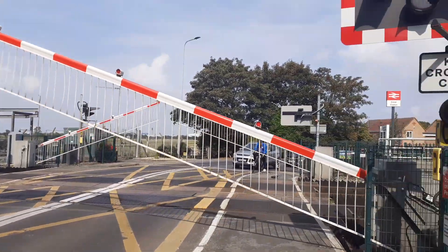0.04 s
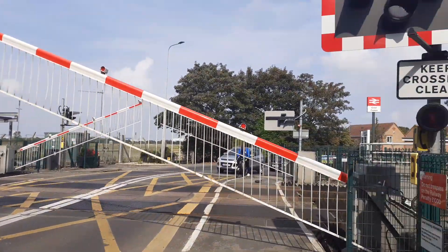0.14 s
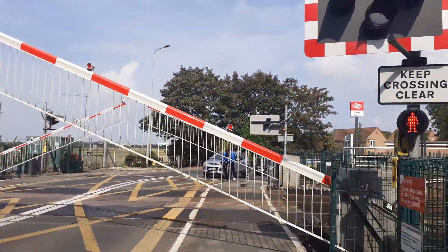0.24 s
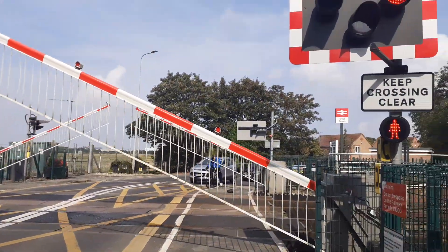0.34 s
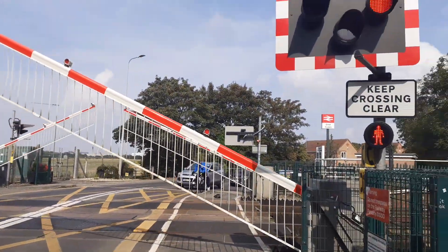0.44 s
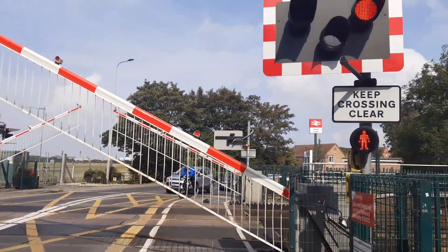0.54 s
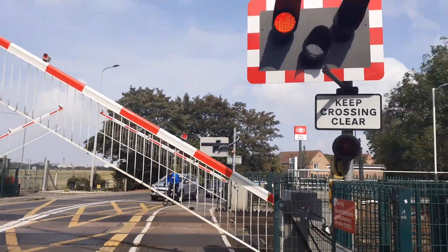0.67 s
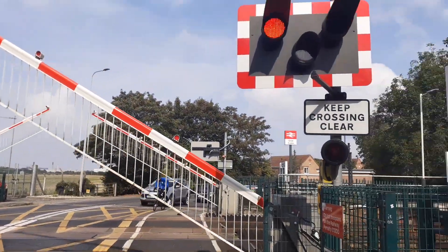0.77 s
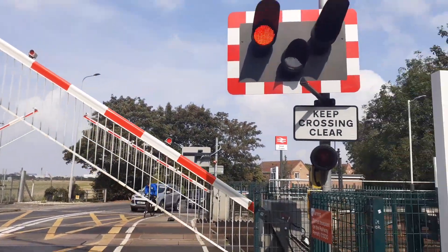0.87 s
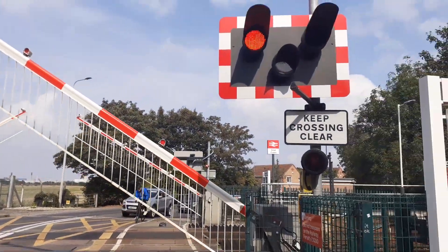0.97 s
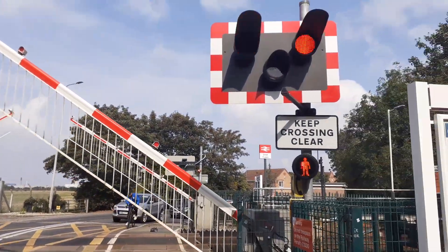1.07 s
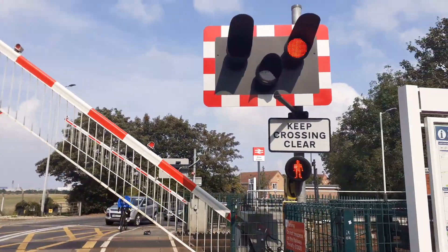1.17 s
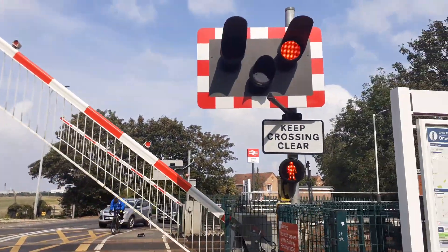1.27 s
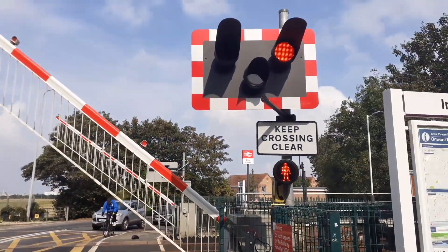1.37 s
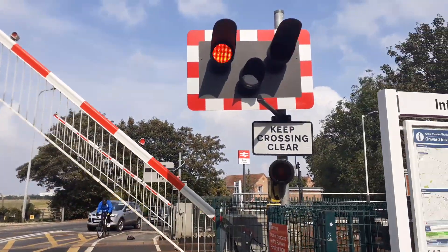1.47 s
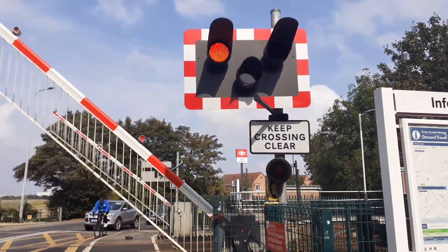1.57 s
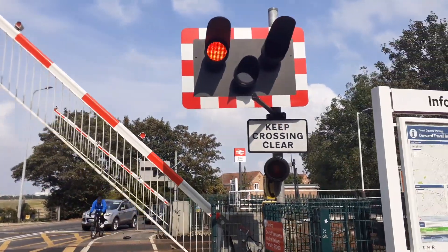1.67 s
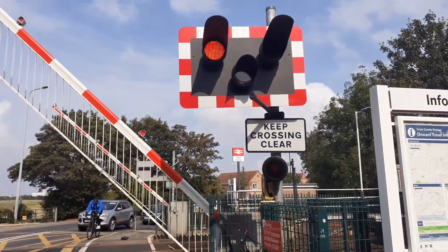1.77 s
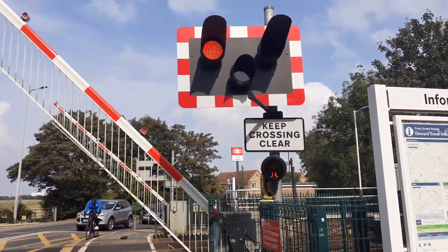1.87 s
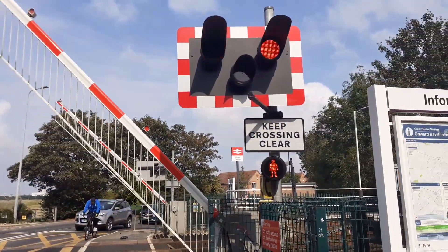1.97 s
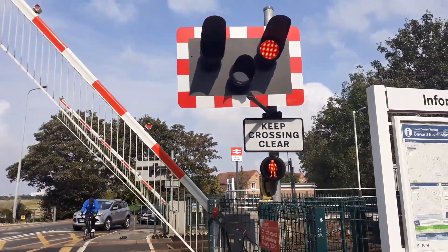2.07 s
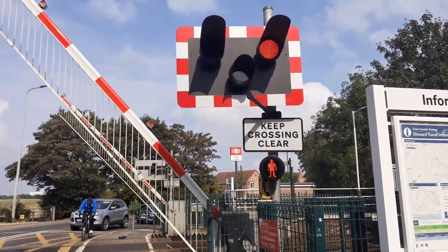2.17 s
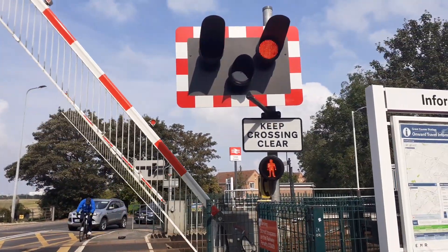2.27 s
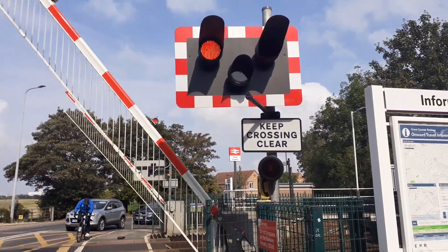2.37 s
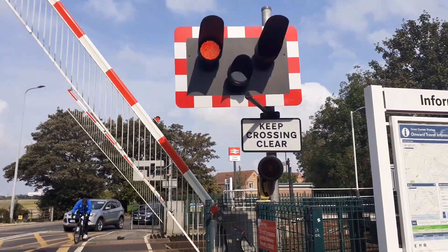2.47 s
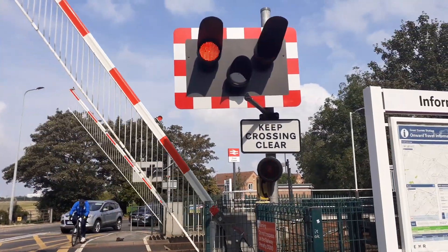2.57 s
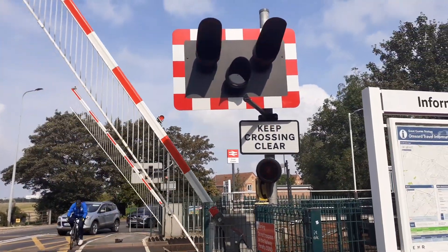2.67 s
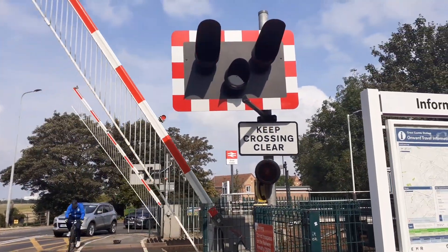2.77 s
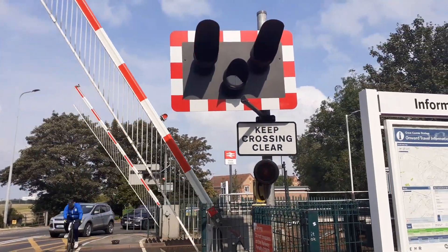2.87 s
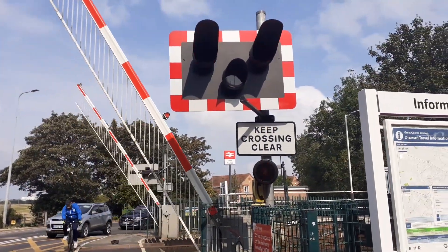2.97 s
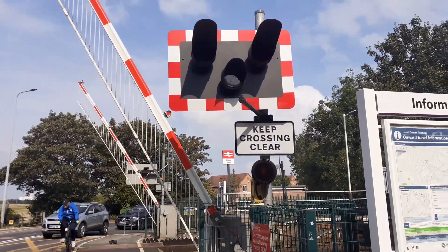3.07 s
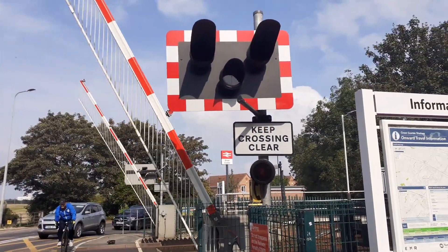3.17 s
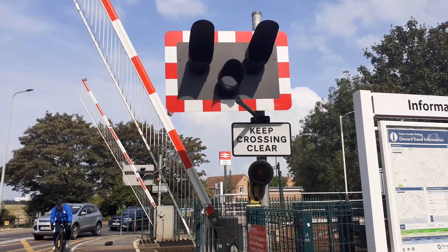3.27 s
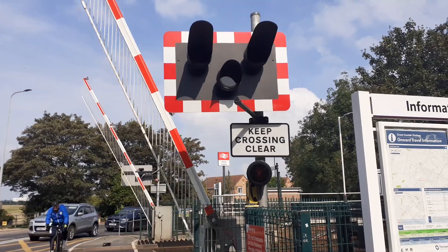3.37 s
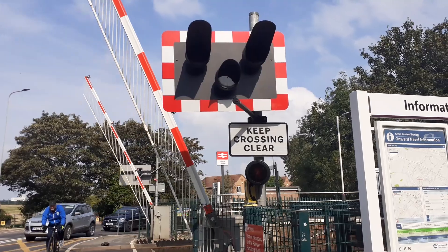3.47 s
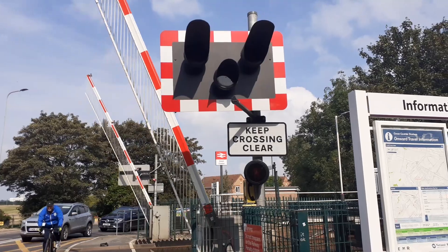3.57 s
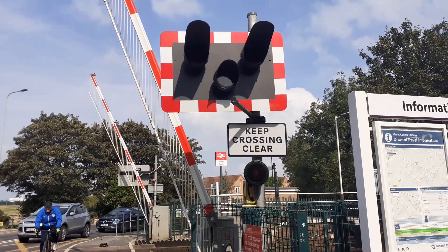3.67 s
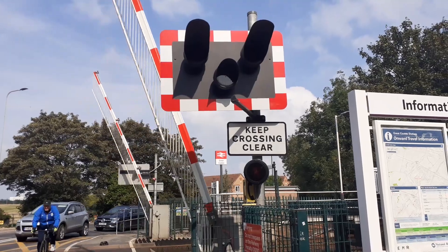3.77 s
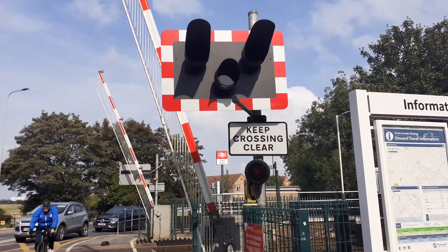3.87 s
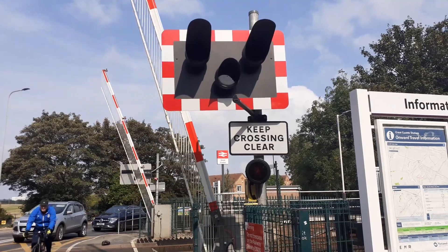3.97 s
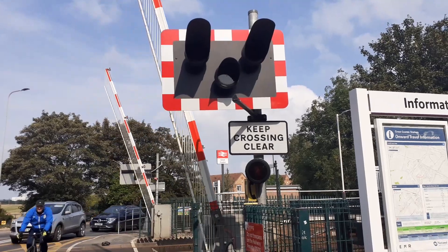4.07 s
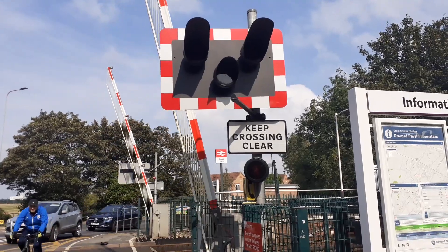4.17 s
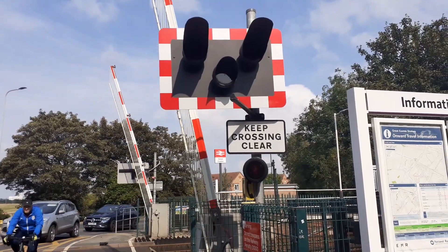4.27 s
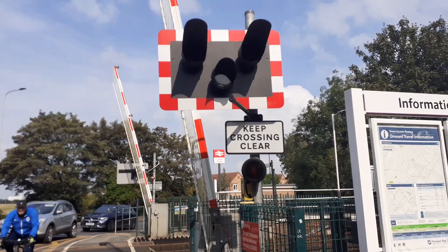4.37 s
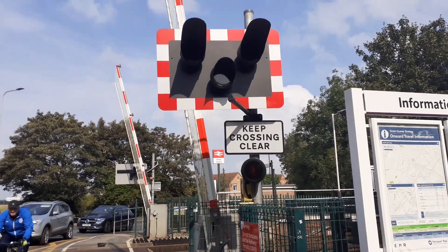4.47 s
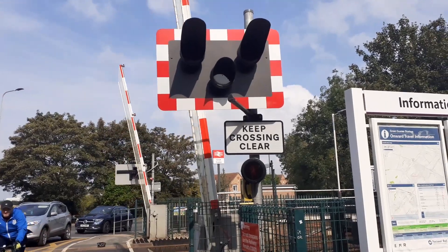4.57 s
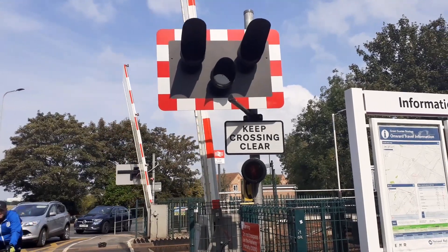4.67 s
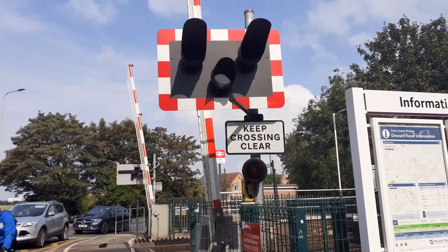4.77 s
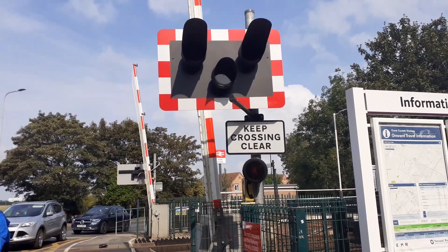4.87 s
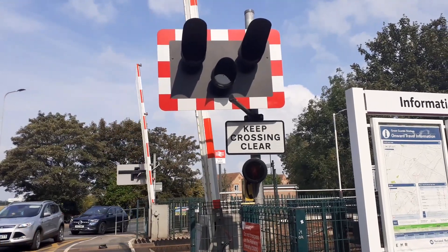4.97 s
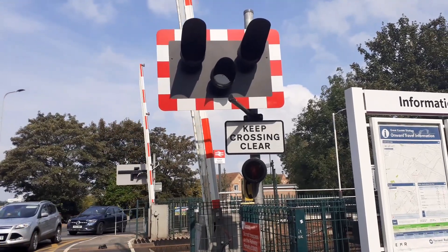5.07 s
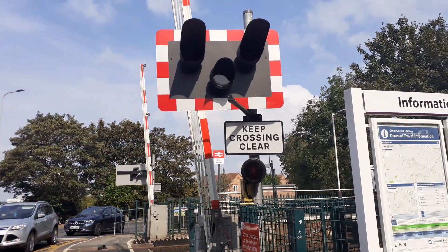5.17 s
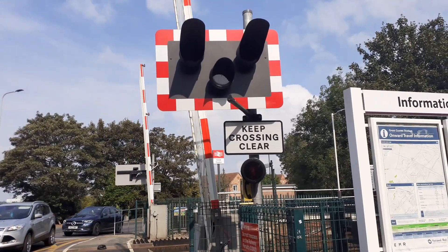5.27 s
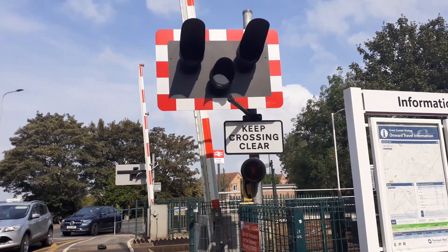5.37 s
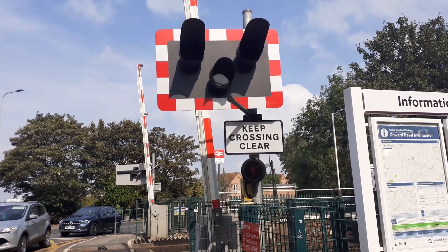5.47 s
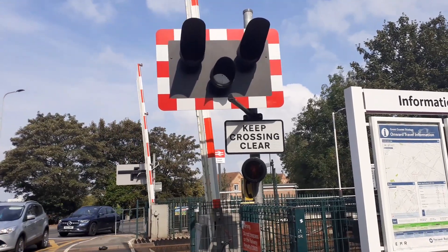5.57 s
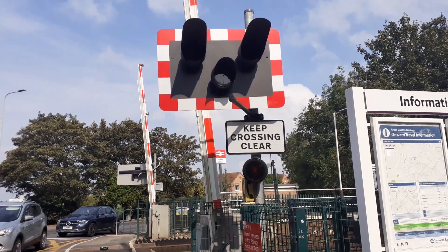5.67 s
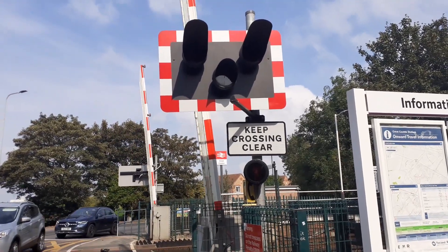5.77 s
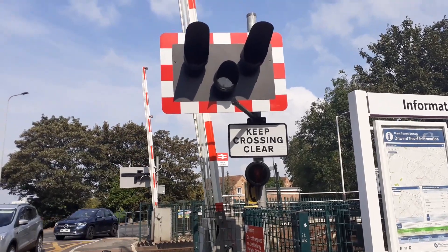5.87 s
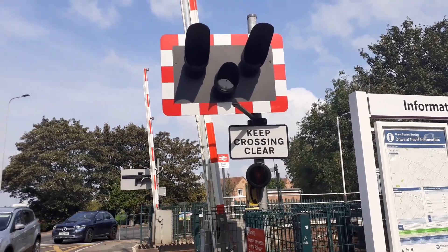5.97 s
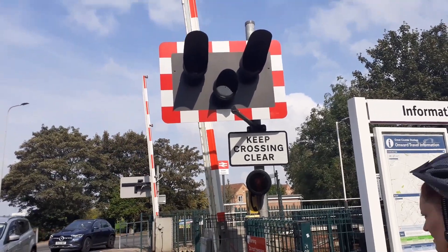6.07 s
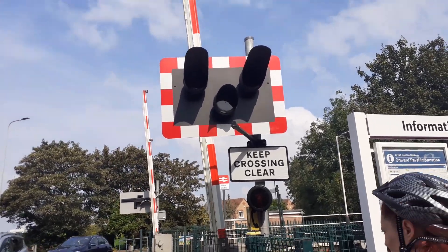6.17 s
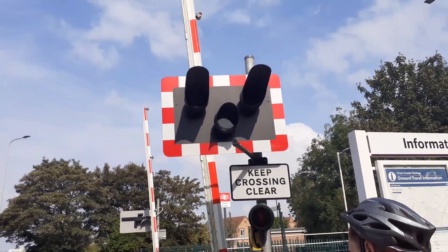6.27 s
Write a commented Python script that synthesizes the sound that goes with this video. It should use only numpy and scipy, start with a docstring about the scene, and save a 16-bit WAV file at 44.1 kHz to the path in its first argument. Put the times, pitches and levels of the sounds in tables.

```python
"""A hum with a quick, uneven throb comes first: hydraulic pumps are lifting level crossing barriers.
Oil rushes and whistles through their valves, and a thin whine comes and goes. The pumps cut out,
and the booms (the barrier arms) settle with a run of clicks and ringing latches. Waiting cars idle,
pull away and bump over the crossing, with low exhaust notes and tyre noise. A bright hiss comes
from the left, and puffs of wind catch the microphone."""
import sys
import numpy as np
from scipy import signal
from scipy.fft import rfft, irfft, next_fast_len
from scipy.io import wavfile
from scipy.ndimage import uniform_filter1d

SR = 44100
rng = np.random.default_rng(int(sys.argv[2]) if len(sys.argv) > 2 else 0)


def store_pcm(level_fs):
    """Save levels as 16-bit WAV."""
    pcm = np.round(np.clip(level_fs, -1, 1) * 32767).astype(np.int16)
    wavfile.write(sys.argv[1], SR, np.atleast_2d(pcm).T)


N = 278752
T = np.arange(N) / SR
HZ = np.maximum(np.arange(next_fast_len(N) // 2 + 1) * SR / next_fast_len(N), 1)
PUMP_STOP_S = 4.706

# the hum sags during the lift: (time [s], pitch [Hz])
HUM_PITCH = [(0, 346.5), (.7, 344.2), (1.55, 341.4), (1.8, 342.6), (2.15, 339), (2.7, 340), (3.4, 338.6),
             (4.4, 336.8), (4.7, 334)]
# how the hum's loudness moves: (time [s], relative level [dB])
HUM_LEVEL = [(0, -19.3), (.2, -20), (.9, -17.5), (1.6, -18.5), (2.55, -19.5), (3.1, -22.5), (3.8, -22),
             (4.25, -18.4), (4.7, -21.3)]
# the hum dips briefly: (time [s], depth [dB])
HUM_DIPS = [(.095, 6.3), (.307, 8.5), (.66, 9), (1.894, 2.7), (2.11, 3.8), (2.263, 6), (2.405, 1.5),
            (3.135, 4.5), (3.6, 4.2), (4.476, 5.7)]
# how fast the hum throbs: (time [s], rate [throbs per s])
THROB_RATE = [(0, 10.57), (.5, 9.09), (.95, 6.16), (1.4, 6.72), (1.8, 7.29), (2.1, 8.27), (2.45, 7.13),
              (2.85, 8.8), (3.2, 8.52), (3.6, 8.33), (4.2, 7.81), (4.6, 7.57)]
# how strongly it throbs: (time [s], swing either way [dB])
THROB_DEPTH = [(0, 1.4), (.5, .9), (1.0, 3), (1.2, 1.1), (1.5, 2.6), (2.0, 1.8), (2.45, 2.4), (3.5, 2.2),
               (3.9, .9), (4.6, 1.3)]
# weaker tones of the pump shaft: (pitch [times the hum's], level against the hum [dB])
SHAFT_TONES = [(3 / 5, -27.5), (4 / 5, -24)]
# where the hum sits between the sides: (time [s], left minus right [dB])
PUMP_PAN = [(0, 6), (.5, 1.5), (2.7, 2.5), (3.15, -0.2), (4.7, 2)]

# a car pulls away: (time [s], firing rate [Hz])
ENGINE_SPEED = [(0, 42.3), (.55, 52.53), (.74, 56.3), (.95, 64.37), (1.45, 72.35), (1.85, 64.6),
                (2.75, 64.3), (3.2, 58.44), (3.85, 65.9), (4.85, 45.54), (5.55, 53.07), (6.0, 57.46),
                (6.32, 58.5)]
# how its loudness moves: (time [s], relative level [dB])
ENGINE_LEVEL = [(0, -40), (.45, -48.5), (.6, -37.5), (.75, -36), (1.15, -44), (1.7, -43.5), (2.1, -38.5),
                (3.0, -42), (3.7, -40), (4.45, -47), (4.9, -42), (5.45, -40.5), (5.9, -38.5), (6.32, -35)]
# its exhaust tones: (pitch [times the firing rate], relative level [dB])
EXHAUST_TONES = [(1, -4), (2, -3), (3, -7), (4, -9.5)]
# the colour (mix of low and high) of traffic rumble: (frequency [Hz], relative level [dB])
RUMBLE_COLOUR = [(25, -32), (45, -7), (70, 0), (105, 0.5), (160, -1), (240, 3), (320, 6.5), (400, 0),
                 (500, -12), (650, -47), (1000, -59)]
# tyres on the road: (frequency [Hz], relative level [dB])
TYRE_COLOUR = [(200, -33), (450, 3.5), (600, 0), (880, 3.5), (1130, -3), (1600, -4), (2300, -11.5),
               (3000, -14), (4200, -17.5), (6000, -20.5), (8200, -23), (9700, -30.5), (12000, -27),
               (16000, -46)]
# how alike left and right are for sound from all around: (frequency [Hz], likeness [-1 to 1])
LIKENESS = [(35, .9), (65, 0.79), (130, 1), (300, 0.92), (450, 0.045), (640, -0.22), (1300, -0.17),
            (2500, 0.0046), (16000, -0.077)]

# wind hits the microphone: (time [s], level [dB], half length [s])
WIND_PUFFS = [(0.046, -32.5, 0.086), (0.556, -37, 0.12), (0.714, -27.5, 0.044), (0.868, -37, .03),
              (1.05, -41, 0.15), (1.9, -39, .15), (2.198, -38, 0.086), (2.537, -21, 0.03), (2.63, -33, .03),
              (4.328, -26.5, 0.048), (4.483, -29, 0.078), (4.65, -34, 0.068), (4.997, -37, .03),
              (5.42, -39, .04), (5.66, -35, 0.083), (6.202, -29, 0.029)]
# the wind is mostly bass: (frequency [Hz], relative level [dB])
WIND_COLOUR = [(25, -32), (50, -11), (75, -2), (105, 2.5), (160, -5.5), (230, -13), (350, -24), (700, -48),
               (2000, -80)]
# the hiss on the left comes up and stays: (time [s], relative level [dB])
HISS_LEVEL = [(0, -60), (.4, -48), (.75, -40), (1.7, -40.5), (2.4, -42), (3.9, -42), (4.6, -46.5),
              (5.1, -41.5), (6.32, -46.5)]
# its colour: (frequency [Hz], relative level [dB])
HISS_COLOUR = [(400, -9), (750, 11.5), (1200, -1.5), (2100, 3.5), (3000, -2.5), (4200, -6.5), (5500, -9.5),
               (7000, -7.5), (8400, -10.5), (9600, -13.5), (12000, -9.5), (14000, -12), (16000, -15.5)]

# rushing oil rings in bands: (pitch [Hz], width [Hz], level while lifting [dB], level near the top [dB])
VALVE_BANDS = [(745, 240, -45, -51), (1203, 140, -60, -50), (1990, 290, -48.5, -71), (2210, 210, -58, -53),
               (2460, 210, -54.5, -70), (4640, 1200, -55.5, -66)]
# three whistling valves, one list each: (time [s], pitch [Hz], relative level [dB])
VALVE_WHISTLES = [
    [(0, 3960, -82), (.5, 4003, -57.5), (1.1, 4060, -55), (1.75, 4130, -59), (2.45, 4100, -66),
     (2.75, 4040, -52.5), (3.25, 4010, -57.5), (3.6, 3920, -53.5), (3.85, 3880, -56), (4.2, 3490, -55),
     (4.7, 3200, -71)],
    [(0, 8000, -78), (.55, 7670, -64), (.85, 7330, -60), (1.2, 7100, -58), (1.75, 7050, -64),
     (2.0, 6720, -59), (3.6, 6698, -71), (3.87, 6950, -56), (4.2, 6743, -68), (4.7, 6700, -78)],
    [(0, 8300, -71), (.8, 8500, -58), (1.5, 8480, -66), (2.5, 8513, -63), (3.1, 8250, -62),
     (3.8, 8620, -60), (4.3, 8320, -61), (4.7, 8200, -71)],
]
# a thin whine, at times an octave up: (start [s], end [s], pitch [Hz], level [dB])
WHINES = [(1.15, 1.65, 760, -44), (3.05, 3.619, 383.8, -42.5), (3.6, 4.1, 760, -49),
          (4.926, 5.107, 377, -36), (5.26, 5.772, 378.5, -34), (5.952, 6.195, 379.5, -38)]

# the booms settle: (time [s], relative level [dB], fall time [s], brightness [dB per octave])
CLICKS = [(4.147, -35, 0.0031, -6), (4.721, -32.5, 0.0057, 2), (4.797, -33, 0.01, -2.5),
          (4.836, -31.5, 0.0038, -3), (4.848, -24, 0.0019, -3), (4.851, -13, 0.00082, 12.5),
          (4.862, -36, 0.027, -3), (4.940, -35, 0.0055, 1), (5.048, -40, 0.0079, 0), (5.101, -38, .002, -2),
          (5.145, -37, .004, 2), (5.155, -34, 0.01, -0.5), (5.167, -41, .004, -1), (5.178, -36, 0.005, -1),
          (5.210, -41, 0.0027, -4), (5.245, -36, 0.003, 1), (5.268, -38, 0.0099, -3), (5.283, -42, .002, 0),
          (5.325, -29, 0.0019, 8), (5.332, -28.5, 0.0022, 3), (5.364, -42, .0015, 5),
          (5.422, -38.5, 0.008, -4), (5.438, -41, 0.0043, 0), (5.463, -39.5, 0.0089, -3),
          (5.593, -34.5, 0.0047, 1), (5.604, -34, .003, 0), (5.612, -29, 0.0053, -3.5),
          (5.626, -28.5, 0.0045, -3), (5.684, -34.5, 0.003, 6), (5.691, -33, 0.0054, 0),
          (5.734, -40, 0.0013, -1), (5.758, -47, 0.0014, 1), (5.777, -34, 0.0037, 6),
          (5.815, -51, 0.0014, 3), (5.824, -35, .002, -14), (5.842, -30, 0.0017, -10),
          (5.868, -37.5, 0.0046, 4), (5.881, -32, .002, -9), (5.897, -30, 0.0025, -6.5),
          (5.91, -35, .003, -6), (5.971, -33.5, 0.0044, -2.5), (6.045, -38, 0.012, -4.5),
          (6.07, -36, .003, 1), (6.087, -38, .002, 6), (6.149, -39, .002, 7), (6.173, -41, .0016, 11),
          (6.183, -45, 0.0011, 7), (6.266, -31, .0015, -6)]
# the colour the clicks share: (frequency [Hz], relative level [dB])
CLICK_COLOUR = [(500, -33), (1200, 1.5), (2300, 3.5), (3500, 3), (5500, 0.5), (7200, 3), (7950, 5.5),
                (8800, 1.5), (9900, -8), (10900, 2), (11450, 3), (11800, 3), (12100, 7), (13100, -2),
                (13900, 1), (14250, 0), (14550, -4), (15400, -2), (17000, -11)]
# latches ring: (time [s], relative level [dB], pitch [Hz], time to fade by 60 dB [s])
LATCHES = [(4.724, -25.5, 2490, 0.046), (4.725, -28, 2040, .03), (4.80, -36, 2850, 0.093),
           (4.848, -25, 1936, 0.038), (4.848, -29, 2410, .03), (4.85, -29, 3280, 0.059),
           (4.85, -32, 4100, .06), (4.917, -26.5, 2290, 0.017), (5.611, -34, 2500, 0.027),
           (5.624, -42, 3060, 0.07), (5.625, -35, 4140, .035), (6.07, -42, 4980, 0.14)]
# dull bumps from wheels and booms: (time [s], relative level [dB], pitch [Hz], fall time [s])
BUMPS = [(4.748, -25.5, 473, 0.013), (4.752, -34.5, 562, 0.0081), (4.759, -17, 336, 0.0073),
         (4.766, -27, 237.4, 0.027), (4.82, -25.5, 337.5, 0.054), (5.164, -24, 320, 0.016),
         (5.824, -30, 400, 0.0081), (5.842, -21, 356, 0.0099), (5.883, -16, 331, 0.011),
         (5.902, -20.5, 333, 0.017), (5.937, -18, 345.4, 0.0083), (6.045, -23.5, 330, .02),
         (6.063, -26, 350, .014), (6.083, -19.5, 230, 0.0084), (6.093, -21.5, 800, 0.0037),
         (6.11, -18, 294, 0.009), (6.123, -21, 345, 0.0046), (6.272, -21, 260, 0.0064),
         (6.293, -23, 340, .012)]
# the microphone's right side is duller: (frequency [Hz], gain [dB])
RIGHT_SIDE_COLOUR = [(100, -0.5), (220, -1), (360, 4), (600, -2.5), (1200, 0), (7000, 0), (9000, -1.5),
                     (12000, -9.5), (16000, -10)]


def from_db(db):
    """Turn decibels into a number to multiply by."""
    return 10 ** (np.asarray(db) / 20)


def rms_one(x):
    """Scale a signal so its average strength (rms) is 1."""
    return x / np.sqrt(np.mean(x ** 2) + 1e-20)


def in_time(rows):
    """Join a table's points with straight lines, giving one curve for each column after time."""
    s, *columns = np.transpose(rows)
    return [np.interp(T, s, c) for c in columns]


def at_hz(points, hz):
    """Read a table between its frequencies, with octaves evenly spaced."""
    known_hz, values = np.transpose(points)
    return np.interp(np.log(hz), np.log(known_hz), values)


def filtered(x, gain):
    """Apply a gain for each frequency in HZ."""
    return irfft(rfft(x, next_fast_len(N)) * gain, next_fast_len(N))[..., :N]


def drift(rate):
    """A smooth random wander of size about 1 that changes about rate times a second."""
    step, warm_up = 40, 2000   # samples per point, points thrown away
    r = np.exp(-2 * np.pi * step * rate / SR)
    kicks = rng.standard_normal(N // step + warm_up + 2)
    slow = signal.lfilter([1], [1, -2 * r, r * r], kicks)[warm_up:]
    return np.interp(np.arange(N) / step, np.arange(len(slow)), rms_one(slow))


def turning(hz):
    """The angle (phase) of something that turns at a changing rate."""
    return 2 * np.pi * np.cumsum(hz) / SR


def noise(colour):
    """Noise of a given colour."""
    return rms_one(filtered(rng.standard_normal(N), from_db(at_hz(colour, HZ))))


def all_around(colour):
    """Noise from all around: left and right are alike in the bass, unrelated in the treble."""
    alike = at_hz(LIKENESS, HZ)
    gains = np.sqrt([1 + alike, 1 - alike]) * from_db(at_hz(colour, HZ))
    mid, side = filtered(rng.standard_normal((2, N)), gains)
    return rms_one(np.array([mid + side, mid - side]))


def from_left(x, lead_ms):
    """A sound on the left reaches the left channel first."""
    return np.array([x, np.interp(T - lead_ms / 1000, T, x)])


def burst(t, rise_s, fall_s):
    """Swell to 1 at t = 0, then die away."""
    return np.exp(np.where(t < 0, t / rise_s, -t / fall_s))


def narrow_band(x, hz, width_hz):
    """Keep the sound near one pitch by passing it twice through a ringing filter."""
    r = np.exp(-np.pi * width_hz / SR)
    b, a = [1, 0, -1], [1, -2 * r * np.cos(2 * np.pi * hz / SR), r * r]
    return signal.lfilter(b, a, signal.lfilter(b, a, x))


def pump_hz(run_down_hz_per_s=13.8):
    """The hum's pitch sags under load, then falls faster once the power is cut."""
    return in_time(HUM_PITCH)[0] - run_down_hz_per_s * np.maximum(T - PUMP_STOP_S, 0)


def pumps(gain_db=-1.78, flutter_db=0.61, wobble_hz=1.176, dip_s=0.035, throb_low_s=2.265):
    """Five pump strokes per turn of the shaft make an almost pure hum, whose level throbs."""
    phase = turning(pump_hz() + wobble_hz * drift(12.5))
    hum = np.sin(phase)
    for multiple, db in SHAFT_TONES:
        hum += np.sin(multiple * phase) * from_db(db + 2 * drift(5.2))
    dips_db = sum(depth_db * np.exp(-((T - s) / dip_s) ** 2) for s, depth_db in HUM_DIPS)
    throb = turning(in_time(THROB_RATE)[0])
    throb_db = in_time(THROB_DEPTH)[0] * np.cos(throb - np.interp(throb_low_s, T, throb))
    # the load drops at once when the power is cut, then the shafts run down
    stopped_s = np.maximum(T - PUMP_STOP_S, 0)
    stop_db = 7 * np.minimum(stopped_s / 0.02, 1) + 27 * stopped_s
    level_db = in_time(HUM_LEVEL)[0] + gain_db - dips_db - throb_db - stop_db + flutter_db * drift(29)
    pan = from_db(in_time(PUMP_PAN)[0] * np.array([[.5], [-.5]]))
    return from_left(np.sqrt(2) * hum * from_db(level_db), lead_ms=0.075) * pan


def engine(jitter=0.0092, rough_db=1.0, pipe_hz=108, pipe_width_hz=11, pipe_db=4.5):
    """Engine firings make low, uneven tones, louder near the pitch at which the exhaust pipe rings."""
    hz, = in_time(ENGINE_SPEED)
    level_db, = in_time(ENGINE_LEVEL)
    phase = turning(hz * (1 + jitter * drift(14.7)))
    exhaust = 0
    for multiple, db in EXHAUST_TONES:
        boost_db = pipe_db / (1 + ((multiple * hz - pipe_hz) / pipe_width_hz) ** 2)
        strength = from_db(db + boost_db + rough_db * drift(17))
        exhaust += strength * np.sin(multiple * phase + rng.uniform(0, 2 * np.pi))
    return from_left(np.sqrt(2) * exhaust * from_db(level_db), lead_ms=0.83)


def road(far_rumble_db=-37.5, far_tyres_db=-38, near_db=-29, closest_s=6.54, gap_m=2.66, m_per_s=3.38):
    """Rumble and tyre noise: far traffic is steady, and one car grows louder as it rolls closer."""
    distance_m = np.hypot(gap_m, m_per_s * (T - closest_s))
    near_car = from_db(near_db) * gap_m / distance_m
    rumble = all_around(RUMBLE_COLOUR) * np.hypot(from_db(far_rumble_db), near_car)
    tyres = all_around(TYRE_COLOUR) * np.hypot(from_db(far_tyres_db), near_car)
    lumps_db, swell_db, grain_db = 0.5 * drift(34), 1.5 * drift(0.62), 0.5 * drift(69)
    return rumble * from_db(lumps_db + swell_db) + tyres * from_db(grain_db)


def wind():
    """Swirling air hits the microphone in short, low puffs, with separate noise on each side."""
    power = sum(from_db(db) ** 2 * np.exp(-2 * ((T - s) / half_s) ** 2) for s, db, half_s in WIND_PUFFS)
    return np.sqrt(power) * np.array([noise(WIND_COLOUR), noise(WIND_COLOUR)])


def with_echoes(x, echo_db=-8.0, sway_ms=0.076):
    """Three quick echoes off posts and fences colour a sound, shifting as the microphone moves."""
    echoes = 0
    for lag_ms in np.geomspace(0.92, 2.6, 3):
        delay_s = (lag_ms + sway_ms * drift(.25)) / 1000
        echoes += np.interp(T - delay_s, T, x)
    return rms_one(x + from_db(echo_db) * echoes)


def hiss(flicker_db=1.53, scatter_db=-8.5, tilt_db_per_octave=9.0):
    """A smooth, bright hiss from the left; fences and posts scatter its treble most."""
    level_db, = in_time(HISS_LEVEL)
    direct = from_left(with_echoes(noise(HISS_COLOUR)), lead_ms=0.434 + 0.013 * T)
    scattered = all_around([(hz, db + tilt_db_per_octave * np.log2(hz)) for hz, db in HISS_COLOUR])
    return (direct + from_db(scatter_db) * scattered) * from_db(level_db + flicker_db * drift(32))


def oil_rush(pulse_depth=0.52, flicker_db=1.5, lift_eases_s=(1.86, 3.5)):
    """Oil rushes through the valves, pulsing with each turn of the shaft until the pumps stop."""
    out = 0
    for hz, width_hz, lifting_db, top_db in VALVE_BANDS:
        band = rms_one(narrow_band(rng.standard_normal((2, N)), hz, width_hz))
        level_db = np.interp(T, lift_eases_s, [lifting_db, top_db])
        out += band * from_db(level_db + flicker_db * drift(57))
    shaft = np.sin(turning(pump_hz()) / 5)
    flow = np.clip(T, .1, 1) * np.clip((PUMP_STOP_S - T) / 0.41, 0, 1)   # fades in, then out
    return out * flow * (1 + pulse_depth * shaft)


def valve_whistles(gain_db=2.0, flicker_db=2.5, wander_hz=25.06, half_widths_hz=(170, 260, 200)):
    """Each valve squeezes the oil and sings a narrow band of noise that slides with the flow."""
    out = 0
    for curve, half_width_hz in zip(VALVE_WHISTLES, half_widths_hz):
        hz, level_db = in_time(curve)
        phase = turning(hz + wander_hz * drift(5))
        # two low noises are shifted up to the whistle's pitch
        a, b = filtered(rng.standard_normal((2, 2, N)), 1 / (1 + (HZ / half_width_hz) ** 2))
        whistle = rms_one(a * np.cos(phase) + b * np.sin(phase))
        out += whistle * from_db(level_db + gain_db + flicker_db * drift(12))
    return out


def whine(fade_s=0.14, waver_hz=0.86, waver_db=0.5):
    """A thin, slightly wavering tone fades in, holds and fades out, several times."""
    out = 0
    for start, end, hz, level_db in WHINES:
        held = np.exp(-np.abs(T - np.clip(T, start, end)) / fade_s)
        tone = np.sin(turning(hz + waver_hz * drift(5.97)))
        out += held * tone * from_db(level_db + waver_db * drift(3.6))
    return from_left(np.sqrt(2) * out, lead_ms=0.4)


def clicks(gain_db=2.5, grit_db=4.5, alike=0.09, rise_share=0.51, tail_db=-9, tail_s=0.052):
    """Each click of the booms is a gritty crunch of many small contacts, with a faint outdoor tail."""
    size, lead_in = 12288, 1536   # samples in one click, and before its peak
    out = np.zeros((2, N + size))
    hz = np.maximum(np.arange(size // 2 + 1) * SR / size, 1)
    octaves = np.log2(np.maximum(hz, 500) / 6000)
    t = (np.arange(size) - lead_in) / SR
    for s, level_db, fall_s, tilt_db in CLICKS:
        rise_s = rise_share * fall_s
        shape = burst(t, rise_s, fall_s)
        grit = from_db(grit_db * rms_one(uniform_filter1d(rng.standard_normal(size), size=40)))
        shared = np.sqrt(alike) * rng.standard_normal(size)
        each_side = np.sqrt(1 - alike) * rng.standard_normal((2, size))
        crunch = rms_one((shared + each_side) * grit * shape) * np.sqrt(np.mean(shape ** 2))
        # a longer contact leaves more sound in the tail, a snap almost none
        tail_gain = from_db(tail_db) * min(fall_s / 0.0065, 1.3)
        tail = tail_gain * burst(t, rise_s, tail_s) * rng.standard_normal((2, size))
        colour = rms_one(from_db(at_hz(CLICK_COLOUR, hz) + tilt_db * octaves))
        click = irfft(rfft(crunch + tail) * colour, size)
        start = round(s * SR) - lead_in
        out[:, start:start + size] += from_db(level_db + gain_db) * click
    return out[:, :N]


def latches(gain_db=-2.5):
    """Small steel parts ring briefly as they snap home."""
    out = np.zeros(N)
    for s, level_db, hz, ring_s in LATCHES:
        t = np.maximum(T - s, 0)
        fade_db = np.minimum(60 * t / ring_s, 200)
        out += from_db(level_db + gain_db - fade_db) * np.sin(2 * np.pi * hz * t)
    return from_left(out, lead_ms=0.051)


def bumps(gain_db=-0.5, rise_share=0.32, ring_share=0.76, width_share=0.28):
    """Each bump of a wheel or boom rings one low note, with a rough rumble around it."""
    out = np.zeros(N)
    for s, level_db, hz, fall_s in BUMPS:
        near = (T > s - .3) & (T < s + .7)
        t = T[near] - s
        shape = burst(t, rise_share * fall_s, fall_s)
        rumble = narrow_band(rng.standard_normal(N // 4), hz, width_share * hz)[-len(t):] * shape
        ring = np.sin(2 * np.pi * hz * t) * shape
        body = np.sqrt(ring_share) * rms_one(ring) + np.sqrt(1 - ring_share) * rms_one(rumble)
        out[near] += from_db(level_db + gain_db) * rms_one(body) * np.sqrt(np.mean(shape ** 2))
    return from_left(out, lead_ms=0.14)


def scene():
    """The barrier machinery in front, with traffic, hiss and wind around it."""
    lifting = pumps() + whine() + oil_rush() + valve_whistles()
    settling = clicks() + latches()
    return lifting + settling + engine() + bumps() + road() + hiss() + wind()


def record(dry):
    """The microphone cuts the very highest treble, and its right side is duller than its left."""
    cutoff_hz = 15800
    low_pass = 1 / np.sqrt(1 + (HZ / cutoff_hz) ** 200)
    right_side = low_pass * from_db(at_hz(RIGHT_SIDE_COLOUR, HZ))
    return filtered(dry, np.array([low_pass, right_side]))


dry = scene()
out = record(dry)
store_pcm(out)
```